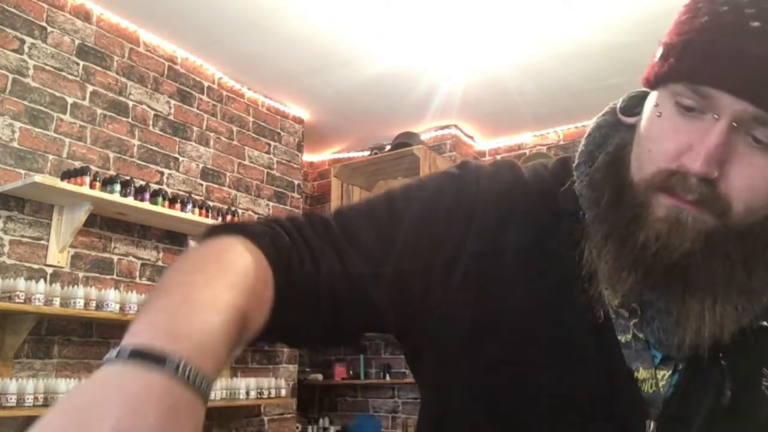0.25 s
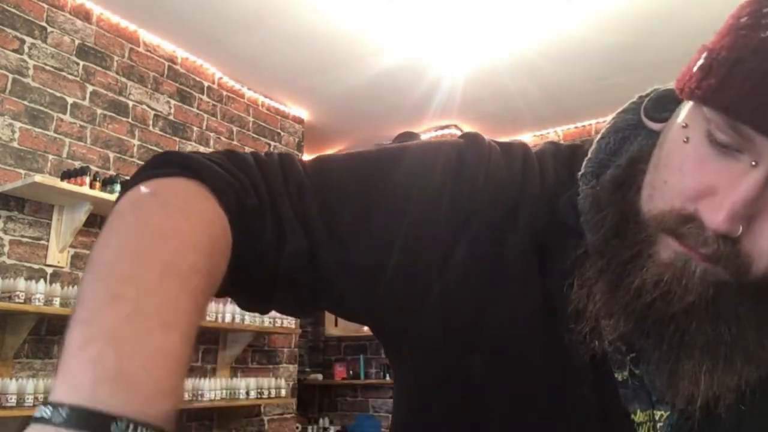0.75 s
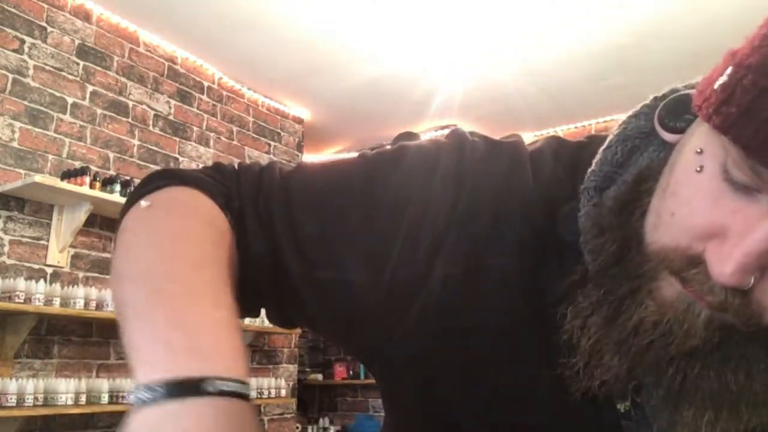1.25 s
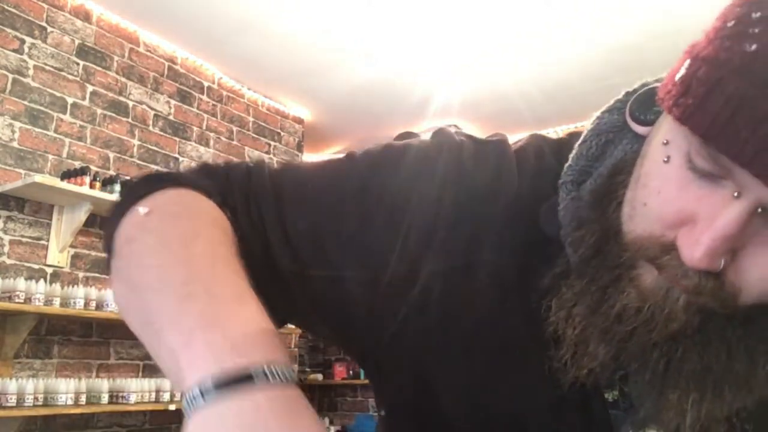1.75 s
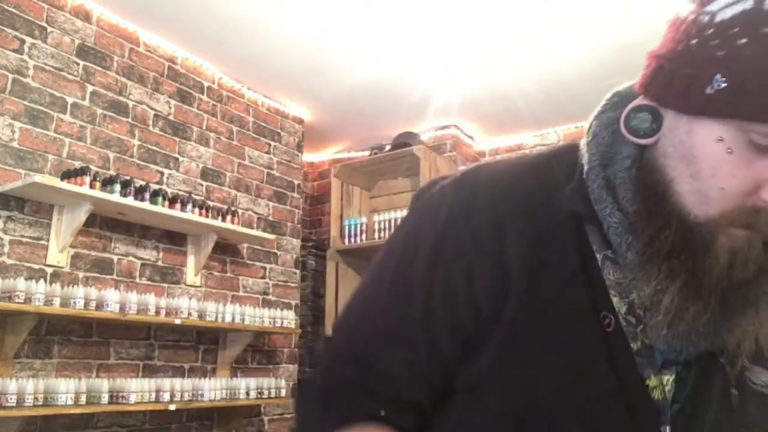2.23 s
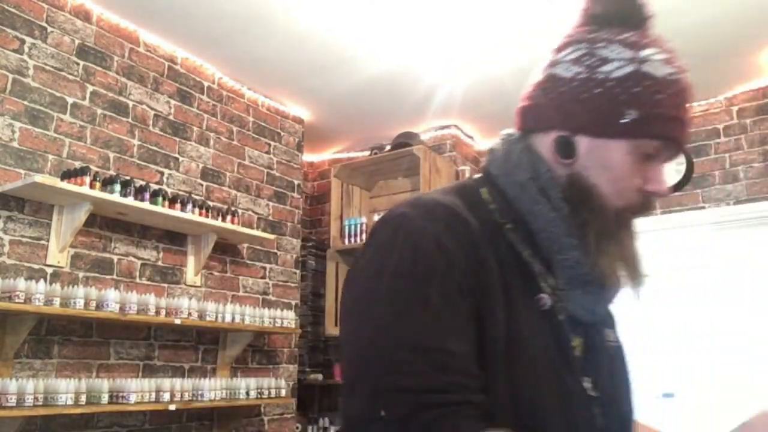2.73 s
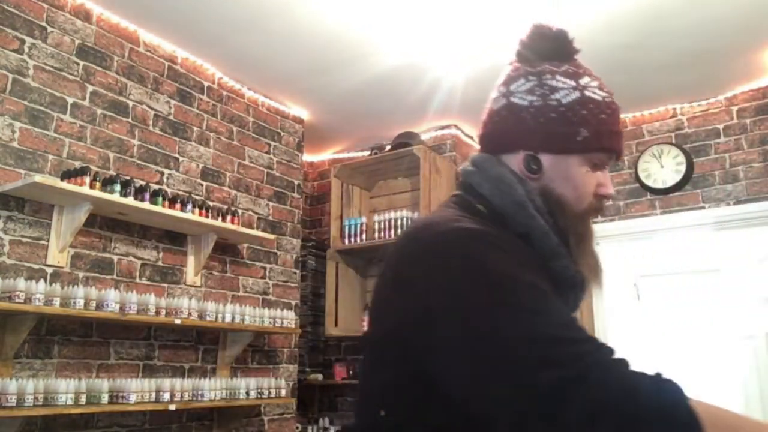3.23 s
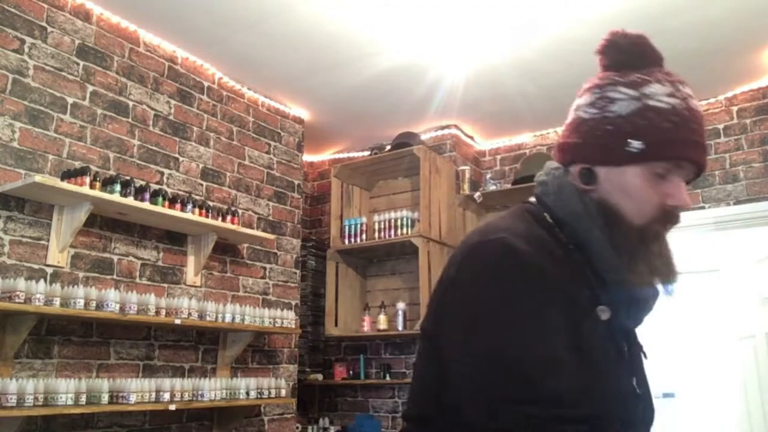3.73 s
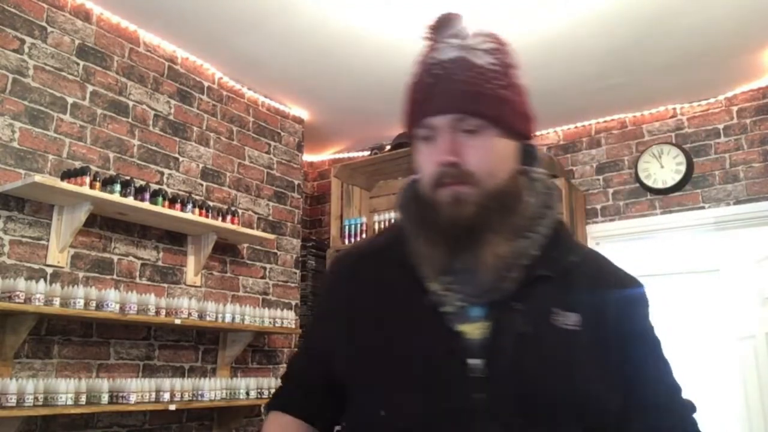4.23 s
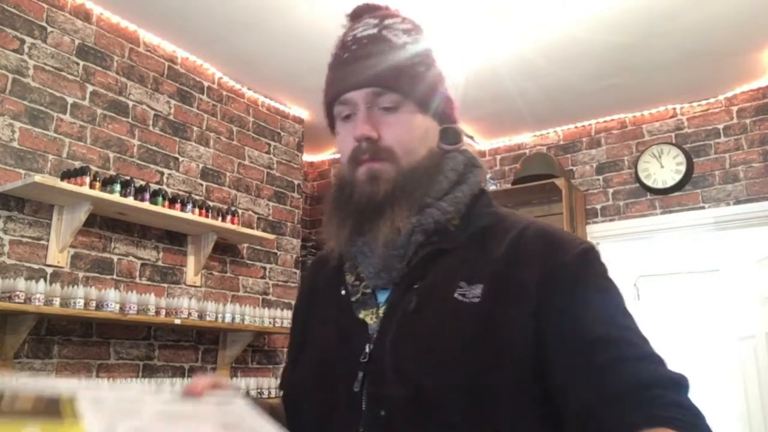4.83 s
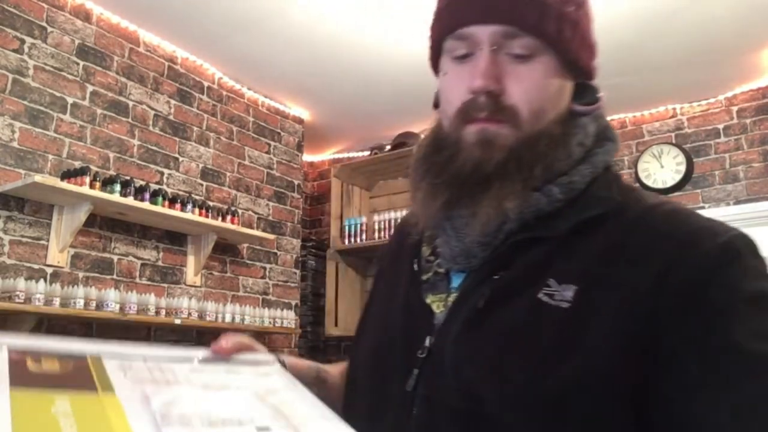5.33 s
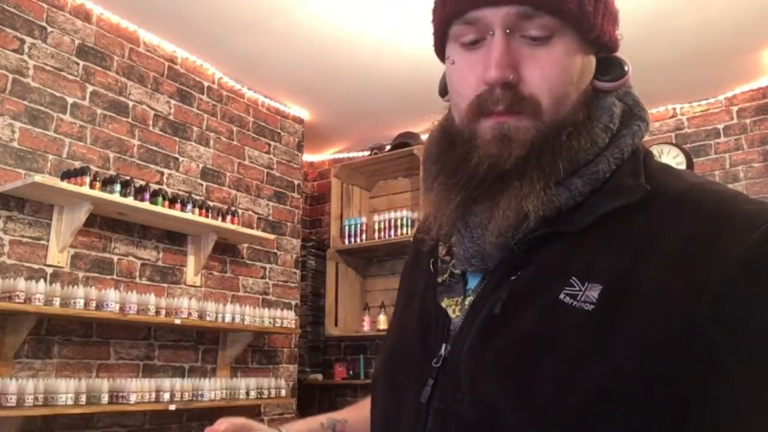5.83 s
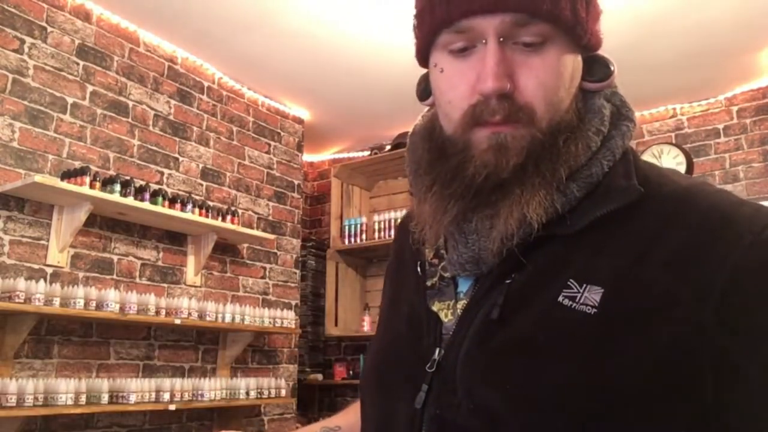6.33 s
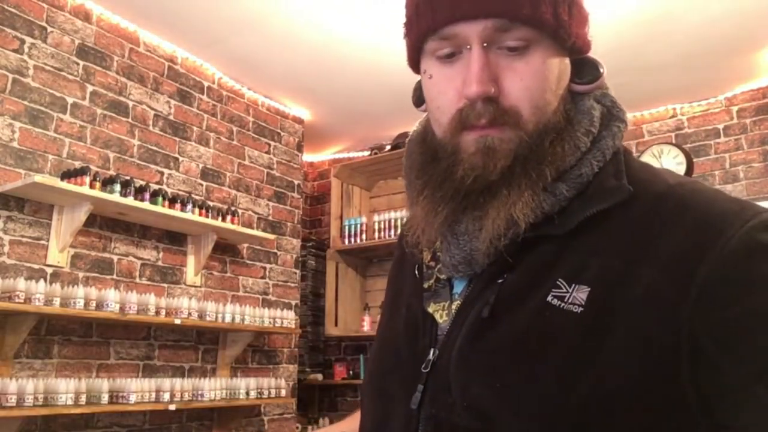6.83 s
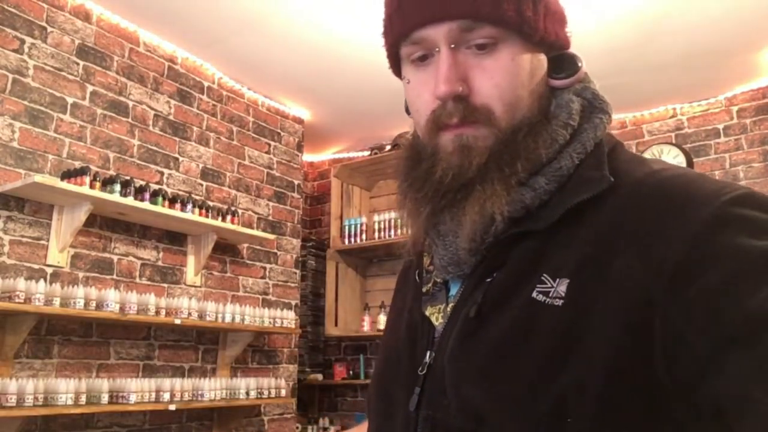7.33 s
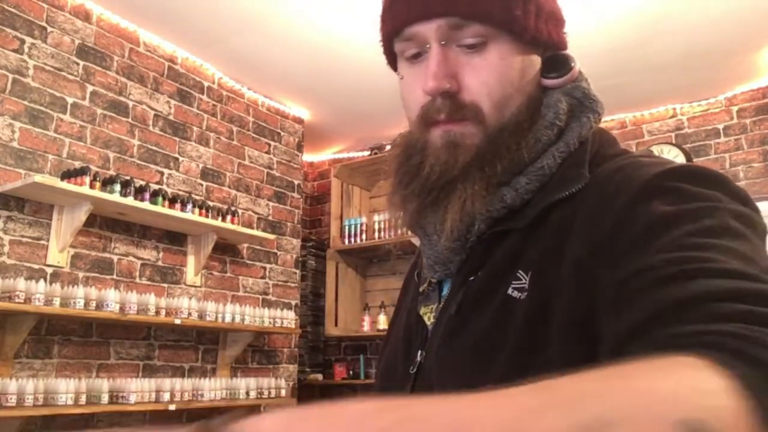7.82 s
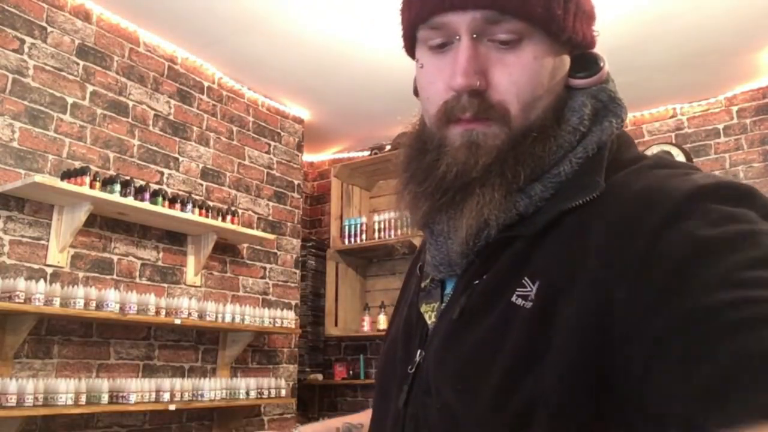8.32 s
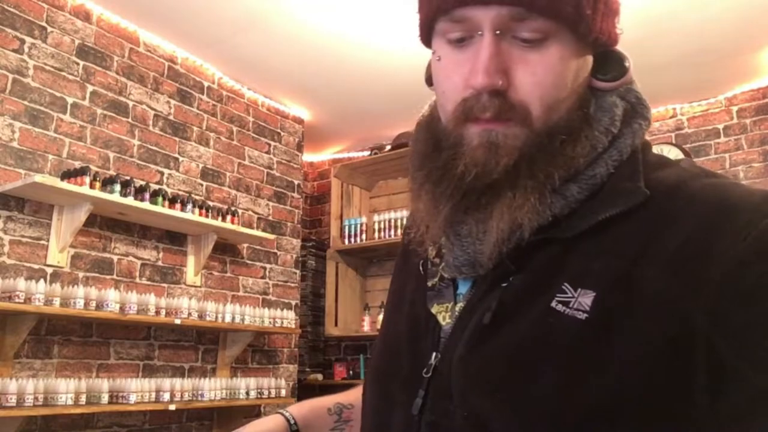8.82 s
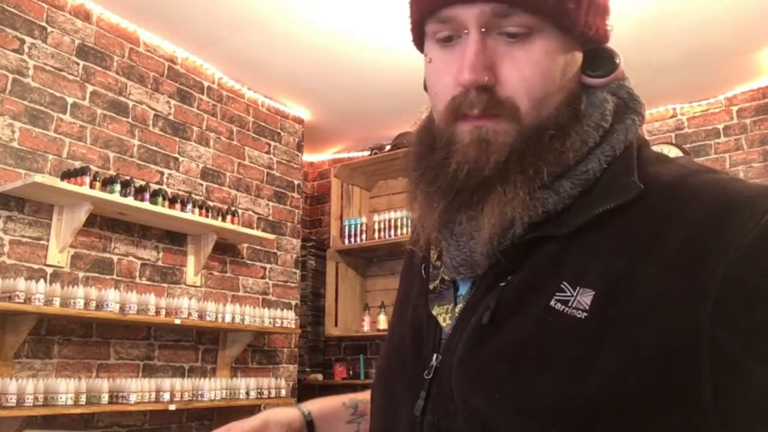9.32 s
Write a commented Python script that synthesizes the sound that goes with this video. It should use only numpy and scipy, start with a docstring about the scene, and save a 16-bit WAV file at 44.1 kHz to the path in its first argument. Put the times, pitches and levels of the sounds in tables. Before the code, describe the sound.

Hands rummage in foam packing peanuts with rustles, crackles and knocks, then a flat box scrapes out boomingly and things clack onto a table.

```python
"""A faint fan and soft rustling come first, then knocks and hands rummaging in foam packing peanuts.
A flat box is dragged out with a booming scrape and shifted with light taps; then goods knock down
on the table and the rustling goes on, in a small room, near a camera.
Rubbing is made of thousands of tiny random slips, coloured as foam, card and box walls.
Blows are short pushes with echoes plus dying sines; the fan is noise gathered around a few pitches."""
import sys
import numpy as np
from scipy import signal
from scipy.fft import rfft, irfft
from scipy.io import wavfile

SR = 44100
rng = np.random.default_rng(int(sys.argv[2]) if len(sys.argv) > 2 else 0)


def master_out(mix):
    """Clip the mix to full scale and print it as 16-bit PCM to the path in sys.argv[1]."""
    frames = np.transpose(np.atleast_2d(mix))
    ceiling = np.clip(frames, -1, 1)
    pcm = np.round(ceiling * 32767).astype(np.int16)
    wavfile.write(sys.argv[1], SR, pcm)


N = 422037  # length in samples


def amp(db):
    """Turns decibels into gain."""
    return 10 ** (np.asarray(db) / 20)


def unit(x):
    """Scales to rms 1."""
    return x / np.sqrt(np.mean(x ** 2) + 1e-20)


def peaked(x):
    """Scales to peak 1."""
    return x / (abs(x).max() + 1e-12)


def read(points, hz):
    """Reads between the points of a table, with pitch on a log scale."""
    f, value = np.transpose(points)
    return np.interp(np.log(hz + 1), np.log(f + 1), value)


def add(mix, s, sound):
    """Mixes a sound in at s seconds."""
    part = mix[max(round(s * SR), 0):][:len(sound)]
    part += sound[:len(part)]


def colour(x, points, size=8192):
    """Filters with a given spectrum that falls steeply beyond its ends and acts only after the input."""
    hz = np.fft.rfftfreq(size, 1 / SR) + 1
    octaves_out = abs(np.log2(hz / np.clip(hz, points[0][0], points[-1][0])))
    gain_db = np.maximum(read(points, hz) - 20 * octaves_out, -90)
    log_gain = np.log(amp(gain_db))
    circle = np.r_[log_gain, log_gain[-2:0:-1]]
    # minimum phase: the filter answers as early as it can
    response = np.exp(np.conj(signal.hilbert(circle)))
    impulse = np.fft.ifft(response).real[:size // 2]
    return signal.oaconvolve(x, impulse)[:len(x)]


def tilted(points, tilt_db):
    """A harder contact lifts the treble of a spectrum by so many dB per octave."""
    hz, db = np.transpose(points)
    return np.c_[hz, db + tilt_db * np.log2(hz / hz[0])]


def spot(points, ripple_db, count=14):
    """Each peanut favours other resonances: a random ripple on its spectrum."""
    hz = np.geomspace(points[0][0], points[-1][0], count)
    return np.c_[hz, read(points, hz) + ripple_db * rng.standard_normal(count)]


# how long echoes take to fade by 60 dB: (f/Hz, fade time/s)
ECHO_FADE = [(100, 0.57), (400, 0.44), (1000, 0.4), (2800, 0.46), (7000, 0.36), (15000, 0.32)]


def tail(size=16384):
    """Dense reflections of energy 1, drawn anew each time, each band dying at its own speed."""
    echoes = rng.standard_normal(size) * (np.arange(size) / SR > .005)
    hz, t, bands = signal.stft(echoes, SR, nperseg=256)
    fading = bands * amp(-60 * t / read(ECHO_FADE, hz)[:, None])
    decay = signal.istft(fading, SR, nperseg=256)[1][:size]
    return decay / np.linalg.norm(decay)


def room(x, wet_db):
    """A sound with its reflections from table and walls."""
    return x + amp(wet_db) * signal.oaconvolve(x, tail())[:len(x)]


def ring(modes, detune, size=16384):
    """Dying sines; each blow lands elsewhere, so pitches and strengths vary a little."""
    t = np.arange(size) / SR
    chance = rng.standard_normal((len(modes), 2))
    out = np.zeros(size)
    for (hz, db, t60), (louder, sharper) in zip(modes, chance):
        fade = amp(db + 2.86 * louder - 60 * t / t60)
        out += fade * np.sin(2 * np.pi * hz * (1 + detune * sharper) * t)
    return peaked(out)


def contact(t60, chatter, size=16384):
    """A sharp push followed by a dying chatter of smaller contacts."""
    push = chatter * rng.standard_normal(size) * amp(-60 * np.arange(size) / SR / t60)
    push[0] += 1
    return push


def blow(points, t60, chatter, wet_db):
    """One contact of peak 1 with its reflections, in the colour of the struck thing."""
    push = contact(t60, chatter)
    echoes = amp(wet_db) * np.linalg.norm(push) * tail()
    return peaked(colour(push + echoes, points, size=4096))


def wobble(per_s):
    """Smooth random ups and downs of rms 1."""
    t = np.arange(N) / SR
    knots = rng.standard_normal(8192)
    return unit(np.interp(t * per_s, np.arange(len(knots)), knots))


def slips(per_s, spread_db, clump_db, clump_rate):
    """Tiny stick-slip releases of uneven size, stronger in clumps."""
    uneven_db = spread_db * np.minimum(rng.exponential(1, N), 4)
    clumps_db = clump_db * np.minimum(wobble(clump_rate), 2)
    sign = rng.choice([-1., 1.], N)
    happens = rng.random(N) < per_s / SR
    return unit(amp(uneven_db + clumps_db) * sign * happens)


def swells(rows):
    """Gain of each short movement, eased in and out."""
    gain = np.zeros(N)
    for start, end, db in rows:
        length = max(int((end - start) * SR), 2)
        add(gain, start, amp(db) * signal.windows.tukey(length, .5))
    return gain


# colour of the room noise: (f/Hz, level/dB)
FLOOR = [(25, -11), (45, 1), (70, -6.5), (115, -7), (160, -9), (240, -9), (330, -13), (410, -4.5),
         (520, -17.5), (900, -13), (1760, -24.5), (4400, -34.5), (9000, -42.5), (16000, -49)]


def room_noise():
    """Steady quiet noise, strongest in the bass."""
    return amp(-53.5) * unit(colour(rng.standard_normal(N), FLOOR))


# soft resonances of the fan: (f/Hz, width/Hz, level/dB)
FAN = [(95, 4.5, -63.5), (376.6, 7.3, -61), (419, 22, -59), (656, 7.4, -70), (4370, 98, -80.5)]


def fan():
    """Noise gathered around a few pitches."""
    hz = np.fft.rfftfreq(N, 1 / SR)
    out = np.zeros(N)
    for centre, width, db in FAN:
        resonance = 1 / (1 + ((hz - centre) / width) ** 2)
        out += amp(db) * unit(irfft(rfft(rng.standard_normal(N)) * resonance, N))
    return out


# the table shudders as weight shifts on it: (start t/s, end t/s, level/dB)
SHOVES = [(.73, .8, -45), (2.65, 2.9, -42), (4.07, 4.19, -50.5), (4.6, 4.98, -49), (5.1, 5.34, -33.5),
          (6.09, 6.25, -41), (6.58, 6.78, -46), (8.0, 9.0, -52.5)]
# colour of the shuddering table: (f/Hz, level/dB)
TABLE = [(45, -14.5), (64, 7.5), (78, -6.5), (100, -11.5), (150, -22)]


def shudders():
    """Low noise swells as the table shakes."""
    return unit(colour(rng.standard_normal(N), TABLE)) * swells(SHOVES)


# foam squeaks thinly as it is pinched: (start t/s, end t/s, level/dB)
SQUEAKS = [(1.625, 1.675, -53), (4.764, 4.784, -42), (5.972, 6.003, -54), (6.05, 6.12, -55)]
# colour of the squeak: (f/Hz, level/dB)
SQUEAK = [(9500, -14), (11500, 5), (12800, -1), (14500, -9), (15800, -16)]


def squeaks():
    """Pinched foam slips in a narrow band of high treble."""
    sound = slips(per_s=1500, spread_db=3, clump_db=2, clump_rate=90)
    return unit(colour(sound, SQUEAK)) * swells(SQUEAKS)


# smooth card sliding on card: (start t/s, end t/s, level/dB)
SWISHES = [(.756, .795, -40.5), (1.15, 1.23, -44), (5.195, 5.208, -35), (5.228, 5.25, -26),
           (5.38, 5.46, -45.5), (5.61, 5.79, -48.5), (8.63, 8.705, -40.5)]
# colour of the swish: (f/Hz, level/dB)
SWISH = [(1500, 0), (2600, -8), (3900, 1.5), (5000, -4), (6500, -3), (9000, -16)]


def swishes():
    """Dense small slips make smooth card swish."""
    sound = slips(per_s=9000, spread_db=2, clump_db=2, clump_rate=70)
    return unit(colour(sound, SWISH)) * swells(SWISHES)


# soft bumps of hand and box: (t/s, level/dB, f/Hz)
BUMPS = [(0.485, -28.5, 187), (.728, -31.5, 148), (1.452, -36, 518), (1.662, -25, 201), (1.71, -37, 205),
         (4.664, -36.5, 140), (4.889, -32.5, 161), (5.149, -43, 181), (5.285, -16.5, 211),
         (5.29, -11.5, 834), (5.295, -17, 360), (5.297, -19, 620), (6.102, -29.5, 170.2),
         (6.154, -26, 119.3), (6.703, -33, 189)]


def bumps(size=8192):
    """A padded push swells over a few milliseconds and rings with one dull pitch and a faint upper one."""
    out = np.zeros(N)
    t = np.arange(size) / SR
    for s, db, hz in BUMPS:
        swell = (1 - np.exp(-t / 0.0019)) * amp(-60 * t * hz / 16)  # card damps out in about sixteen cycles
        tone = np.sin(2 * np.pi * hz * t) + amp(-14) * np.sin(2 * np.pi * 1.95 * hz * t)
        add(out, s, amp(db) * peaked(swell * tone))
    return out


# foam and tape snapping: (t/s, level/dB)
SNAPS = [(1.101, -40), (1.645, -31), (2.0106, -38), (2.248, -38), (2.4094, -37), (2.5294, -26.5),
         (2.58, -31), (2.801, -34), (3.0881, -21.5), (3.1584, -28), (3.1832, -34), (3.5326, -38),
         (4.777, -20), (5.243, -9), (5.2739, -26), (5.3652, -17), (8.6365, -26), (8.775, -32)]
# colour of a snap: (f/Hz, level/dB)
SNAP = [(2000, -21), (3500, -2), (5500, 3), (8000, -2), (10300, -1), (13000, -1), (15800, -15)]


def snaps():
    """Each snap is a single bright crinkle."""
    out = np.zeros(N)
    for s, db in SNAPS:
        add(out, s, amp(db) * blow(SNAP, t60=0.021, chatter=0.14, wet_db=-13.5))
    return out


# a hollow pop as the box comes free: (t/s, level/dB)
POP = (4.777, -17)
# ringing pitches of the hollow: (f/Hz, level/dB, time to fade by 60 dB/s)
HOLLOW = [(283, -13.5, 0.099), (320, -14, .1), (685, -19, 0.13), (773, -9, 0.12), (850, 3.5, 0.05),
          (944, -6, 0.031), (1390, -10, 0.06)]


def pop():
    """The hollow rings briefly as the box comes free."""
    out = np.zeros(N)
    s, db = POP
    add(out, s, amp(db + 1.0) * room(ring(HOLLOW, detune=0.0036), wet_db=-10))
    return out


# colour of a sharp crack at a card surface: (f/Hz, level/dB)
CRACK = [(1500, -33), (3500, -13.5), (5500, -3.5), (7000, -14), (9400, -10), (11000, -18.5), (13500, -14.5),
         (16000, -20)]


def surface_crack(t60, chatter, wet_db):
    """The bright part of a contact, shared by taps and knocks."""
    return blow(CRACK, t60, chatter, wet_db)


# ringing pitches of a stiff card panel: (f/Hz, level/dB, time to fade by 60 dB/s)
PANEL = [(1120, -8, .07), (1390, 2, .06), (1710, 7, 0.044), (1853, -6, 0.055), (2050, -1, 0.11),
         (2500, -2.5, 0.075), (3095, -6, 0.043)]


def panel_ring(detune):
    """Short ring of a stiff card panel, shared by taps and knocks."""
    return ring(PANEL, detune)


# light taps of stiff card edges: (t/s, level/dB, tick level against the tap/dB, hardness/dB per octave)
TAPS = [(2.0712, -36.5, -17, -5), (5.449, -24.5, -27, -8), (5.497, -31.5, -34, 1), (5.7946, -27, -22, 0),
        (5.8433, -32, -26, -4), (5.908, -26, -26, -1), (5.9914, -25, -23.5, -4.5), (6.102, -18, -22.5, 3.5),
        (6.2141, -34, -20, -3), (6.223, -30.5, -12, -3), (6.2417, -34, -24, -2), (6.48, -36.5, -10, 8),
        (6.5854, -32, -13, -5), (6.6318, -20.5, -25, -2.5), (6.6895, -29, -19, -3),
        (6.7052, -24.5, -17.5, -2), (6.7142, -24, -27, -4), (6.8168, -24.5, -16, -2.5),
        (7.8181, -40.5, -28, 2), (8.1888, -16.5, -20.5, 2), (8.4234, -32, -25, 8), (8.451, -29.5, -26, 2)]
# colour of a card edge: (f/Hz, level/dB)
EDGE = [(600, -16.5), (950, -8.5), (1230, 1), (1400, -3), (1600, 2), (1800, -2.5), (2030, -2.5), (2300, -9),
        (2530, -11), (3200, -17.5), (4500, -33)]


def taps():
    """Card edges tap and tick, and the panel rings briefly."""
    out = np.zeros(N)
    for s, db, tick_db, hardness_db in TAPS:
        tap = blow(tilted(EDGE, hardness_db), t60=0.018, chatter=0.14, wet_db=-9.0)
        tick = amp(tick_db + 9.0) * surface_crack(t60=0.015, chatter=0.21, wet_db=-10.0)
        panel = amp(-12) * panel_ring(detune=0.028)
        add(out, s + .0005, amp(db) * (tap + tick + panel))
    return out


# hard blows on box and table; thud and crack are set against the clack:
# (t/s, level/dB, thud level/dB, crack level/dB, hardness/dB per octave)
KNOCKS = [(0.425, -23.5, -18, -27.5, -3), (0.482, -28, -8, -22, -7), (0.724, -14, -21, -40, -1.5),
          (0.729, -31, -2.5, -27, 3), (5.284, -7, -34, -37, -6), (5.292, -19.5, -2, -27, -6.5),
          (6.616, -26, -15, -27, -10.5), (6.704, -30.5, -1, -28, -7), (8.054, -14.5, 0, -30, -3),
          (8.066, -38, 18.5, -32, 3), (8.307, -5.5, -12, -12.5, 0.5), (8.353, -14.5, -6.5, -26, 2.5),
          (8.387, -20, -3.5, -29, 2.5)]
# colour of the clack: (f/Hz, level/dB)
CLACK = [(130, -24), (170, -7.5), (400, -1.5), (650, 1), (900, 0), (1200, -2.5), (1500, -5.5), (1850, -1.5),
         (2200, -6.5), (2500, -7.5), (3200, -9.5), (4500, -25), (9000, -31)]
# ringing pitches of the struck box: (f/Hz, level/dB, time to fade by 60 dB/s)
BOX = [(118, -13, .25), (147, -19, .15), (190, -7.5, 0.24), (243.7, -5.5, 0.24), (281, 3, 0.12),
       (348, -6, 0.092), (453, -12, 0.14), (636, -4, 0.071), (826, -10, .05)]


def knocks():
    """Each blow cracks at the surface, clacks in the panel and sets the box ringing."""
    out = np.zeros(N)
    for s, db, thud_db, crack_db, hardness_db in KNOCKS:
        clack = blow(tilted(CLACK, hardness_db), t60=0.022, chatter=0.24, wet_db=-7.0)
        crack = amp(crack_db + 11.5) * surface_crack(t60=0.02, chatter=0.13, wet_db=-15.0)
        # the box ring keeps little deep bass, falling off below 150 Hz and above 1200 Hz
        box = colour(ring(BOX, detune=0.024), [(150, 0), (1200, 0)])
        thud = amp(thud_db + 5.0) * box
        panel = amp(-17.5) * panel_ring(detune=.004)
        add(out, s + .001, amp(db + 0.5) * (clack + crack + room(thud + panel, wet_db=-6.0)))
    return out


LET_GO_DB_PER_S = 330  # how fast the rubbing dies after a movement
# the long pull that drags the flat box out: (t/s, effort level/dB)
PULL = [(4.8, -40), (4.95, -26.5), (5.06, -20), (5.189, -6), (5.245, -2), (5.289, -0.5), (5.325, -13),
        (5.38, -12), (5.46, -20), (5.62, -26)]


def pull(t):
    """Effort of the long pull in dB, dying away outside it."""
    s, effort_db = np.transpose(PULL)
    outside_s = abs(t - np.clip(t, s[0], s[-1]))
    return np.interp(t, s, effort_db) - LET_GO_DB_PER_S * outside_s


EASE_DB = 7.5  # a stroke is this much weaker at its start and end than where it presses hardest
GRIP_DB_PER_S = 1400  # how fast the rubbing sets in before a stroke


def stroke(t, start, hardest, end):
    """Gain of one stroke: the hand grips, presses harder, eases off and lets go."""
    press_db = np.interp(t, [start, hardest, end], [-EASE_DB, 0, -EASE_DB])
    before_db = GRIP_DB_PER_S * np.maximum(start - t, 0)
    after_db = LET_GO_DB_PER_S * np.maximum(t - end, 0)
    return amp(press_db - before_db - after_db)


# hand strokes through the peanuts and over the card:
# (start t/s, hardest t/s, end t/s, foam level/dB, card level/dB, box walls level/dB)
STROKES = [(0.43, 0.598, 0.68, -53.5, -46.5, -48), (0.692, 0.777, 0.82, -41.5, -40, -42.5),
           (0.906, 0.97, 1.11, -62.5, -60, -55), (1.158, 1.195, 1.225, -39, -41.5, -56),
           (1.44, 1.553, 1.64, -56, -55, -51.5), (1.643, 1.665, 1.68, -55, -45.5, -43),
           (1.957, 2.0, 2.22, -66.5, -61, -54), (2.227, 2.244, 2.38, -60, -61, -66),
           (2.403, 2.517, 2.57, -48.5, -47, -54), (2.598, 2.738, 2.814, -42, -40.5, -43.5),
           (2.84, 2.893, 2.93, -53.5, -49.5, -49), (2.93, 2.998, 3.09, -50.5, -47.5, -60),
           (3.084, 3.1, 3.21, -45, -44, -51), (3.232, 3.271, 3.37, -52.5, -46, -51),
           (3.399, 3.441, 3.454, -45.5, -42.5, -43), (3.484, 3.534, 3.61, -55, -52, -61),
           (3.588, 3.612, 3.93, -67, -60, -66), (4.432, 4.7, 4.9, -60.5, -58, -50),
           (4.764, 4.771, 4.785, -39, -34.5, -33.5), (5.62, 5.752, 5.93, -49.5, -53, -45),
           (5.78, 5.81, 6, -64, -40.5, -44), (5.864, 5.947, 6.04, -57, -50, -40.5),
           (6.03, 6.087, 6.17, -50.5, -50, -51), (6.12, 6.156, 6.4, -60.5, -51.5, -46.5),
           (6.573, 6.601, 6.64, -50, -42, -36), (6.662, 6.71, 6.75, -49.5, -51, -45),
           (6.819, 6.84, 7, -59.5, -61, -56), (7.7, 7.92, 8.03, -70.5, -69, -55),
           (8.046, 8.078, 8.2, -69, -60, -44), (8.315, 8.34, 8.45, -58, -42, -42),
           (8.425, 8.58, 8.8, -62.5, -50, -47), (8.637, 8.648, 8.7, -36, -41, -55),
           (8.717, 8.746, 8.73, -38.5, -48, -59), (8.828, 8.83, 9.07, -55.5, -58, -52),
           (9.088, 9.108, 9.15, -46, -51, -43.5), (9.152, 9.182, 9.25, -48.5, -50, -42.5),
           (9.268, 9.334, 9.48, -54, -48.5, -44.5), (9.494, 9.555, 9.56, -52.5, -42, -41.5)]
# hands resting on the parcel: one level/dB each for foam, card, walls
RESTING_DB = [-74.5, -63, -61]
# how foam, card and walls (one row each) answer the pull: (level/dB at full effort, dB per dB of effort)
PULL_ANSWER = [(-35, 0.67), (-26.5, 0.9), (-20.5, 1.04)]


def handling(count=5000):
    """Gains of foam, card and walls: resting hands, the long pull and the strokes add in power."""
    t = np.linspace(0, N / SR, count)
    power = []
    for rest_db, (full_db, slope) in zip(RESTING_DB, PULL_ANSWER):
        power.append(amp(rest_db) ** 2 + amp(full_db + slope * pull(t)) ** 2)
    power = np.array(power)
    for start, hardest, end, *levels_db in STROKES:
        power += np.outer(amp(levels_db), stroke(t, start, hardest, end)) ** 2
    return [np.interp(np.arange(N) / SR, t, gain) for gain in np.sqrt(power)]


# colour of box walls booming: (f/Hz, level/dB)
BOOM = [(40, -33), (65, 1.5), (95, -0.5), (115, 0.5), (135, -3.5), (190, 6), (240, -4), (290, 1),
        (400, -1.5), (550, -4), (800, -9), (1300, -30.5)]


def walls_boom():
    """Slips shake the box walls, which boom."""
    shaking = slips(per_s=2500, spread_db=2.5, clump_db=2.0, clump_rate=60)
    return amp(-0.5) * unit(colour(shaking, BOOM))


# colour of card scraping: (f/Hz, level/dB)
SCRAPE = [(350, -9.5), (600, 2), (850, 2), (1100, 4.5), (1600, 2.5), (2400, -5.5), (3300, -7), (4300, -20),
          (5500, -34.5)]


def card_scrape(fine):
    """Fine slips and rougher catches rasp on the card."""
    catches = slips(per_s=300, spread_db=2.5, clump_db=7.0, clump_rate=39)
    return amp(-2.0) * unit(colour(fine + amp(-3) * catches, SCRAPE))


# colour of foam rustling: (f/Hz, level/dB)
RUSTLE = [(1290, -34.5), (2200, -4.5), (2550, -1.5), (4490, -3), (4880, -6.5), (6010, -3), (9480, -6.5),
          (10400, -8.5), (15100, -13), (16000, -23)]


def foam_rustle(fine):
    """Fine slips hiss in the foam, and peanuts crackle one by one."""
    crackle = np.zeros(N)
    for _ in range(6):  # peanuts of different sizes, each with its own colour
        releases = slips(per_s=35, spread_db=4, clump_db=2, clump_rate=30)
        crackle += colour(releases, spot(RUSTLE, ripple_db=6))
    return amp(-0.13) * (unit(colour(fine, RUSTLE)) + amp(-5) * unit(crackle))


def rubbing():
    """The same hand movements drive foam, card and box walls."""
    foam_gain, card_gain, walls_gain = handling()
    fine = slips(per_s=14000, spread_db=3.5, clump_db=2.0, clump_rate=130)
    foam = foam_rustle(fine) * foam_gain
    card = card_scrape(fine) * card_gain
    walls = walls_boom() * walls_gain
    return foam + card + walls


def scene():
    """Everything happens on the table, close to the microphone."""
    background = room_noise() + fan()
    sliding = shudders() + squeaks() + swishes()
    hits = room(bumps(), wet_db=-9.0) + snaps() + pop() + taps() + knocks()
    mix = background + hits + room(rubbing() + sliding, wet_db=-12.5)
    return mix[None]


def record(dry):
    """The camera cuts the deep bass and the highest treble."""
    bass_cut = signal.butter(3, 33, "highpass", fs=SR, output="sos")
    lean = signal.sosfilt(bass_cut, dry)
    treble_cut = signal.firwin(511, 15900, window=("kaiser", 9), fs=SR)  # edge in Hz
    return signal.oaconvolve(lean, treble_cut[None], "same")


dry = scene()
out = record(dry)
master_out(out)
```